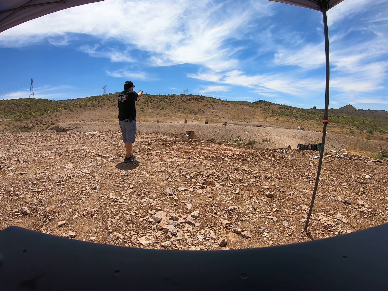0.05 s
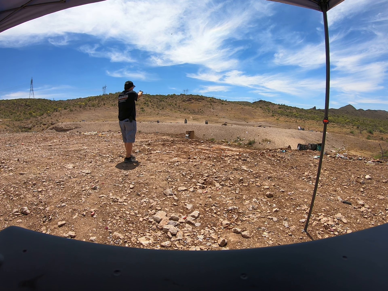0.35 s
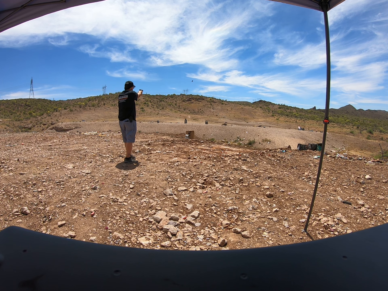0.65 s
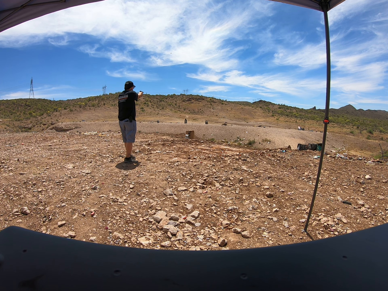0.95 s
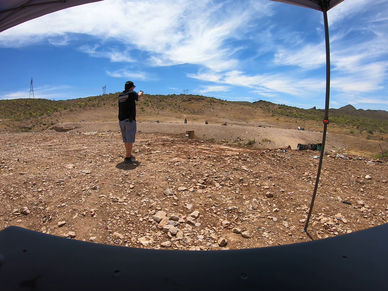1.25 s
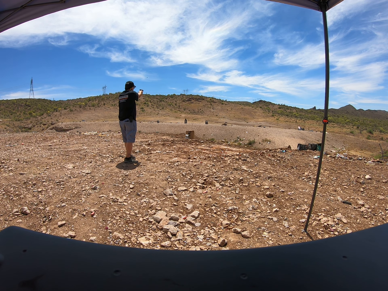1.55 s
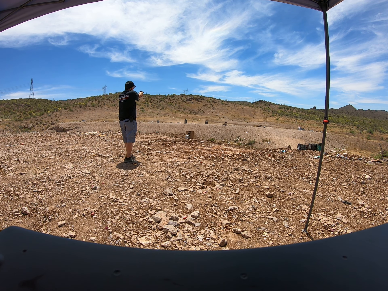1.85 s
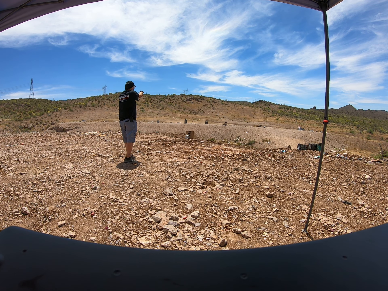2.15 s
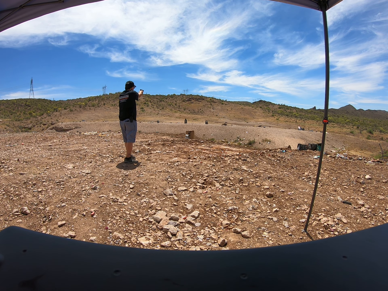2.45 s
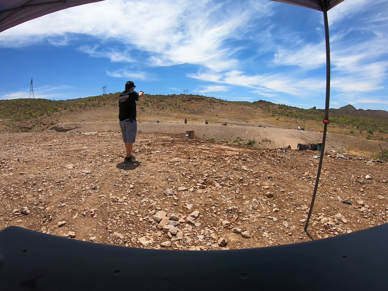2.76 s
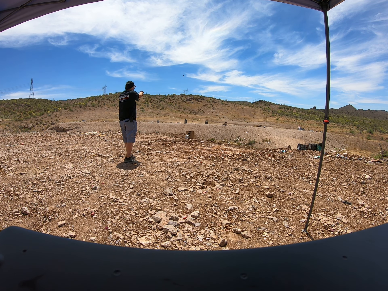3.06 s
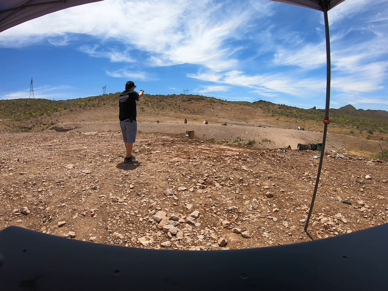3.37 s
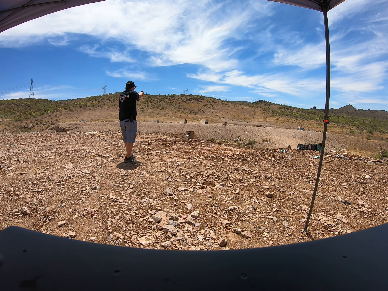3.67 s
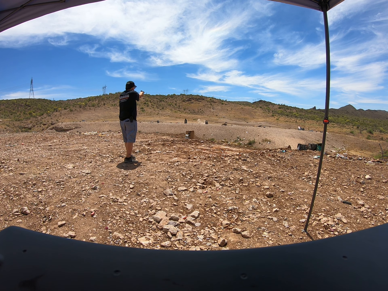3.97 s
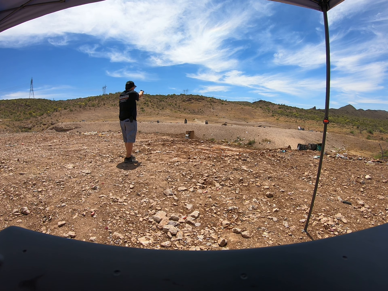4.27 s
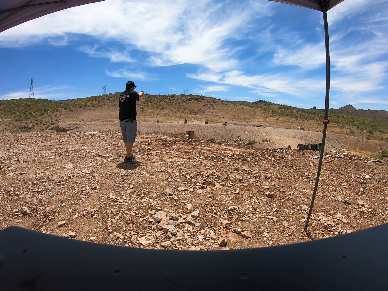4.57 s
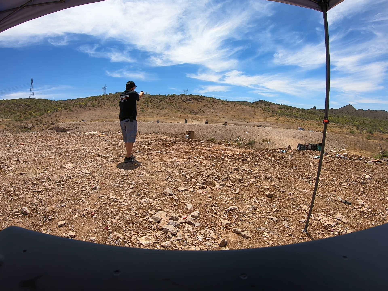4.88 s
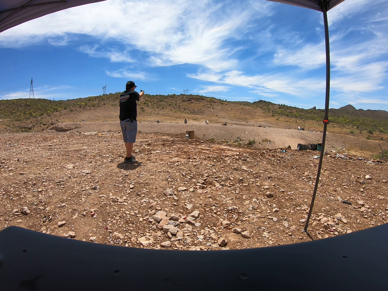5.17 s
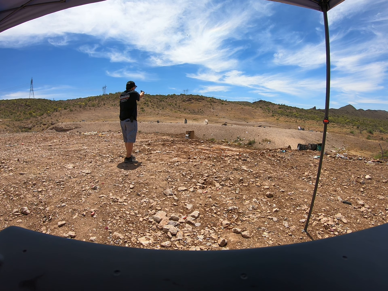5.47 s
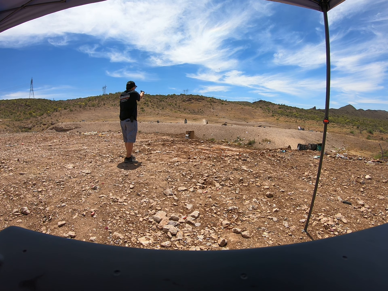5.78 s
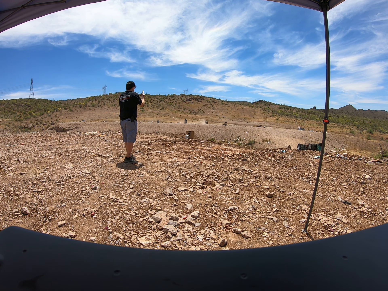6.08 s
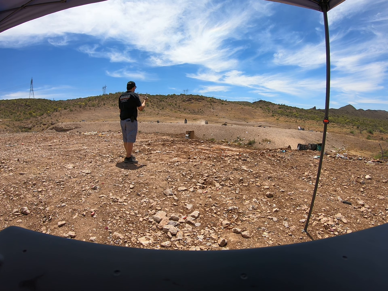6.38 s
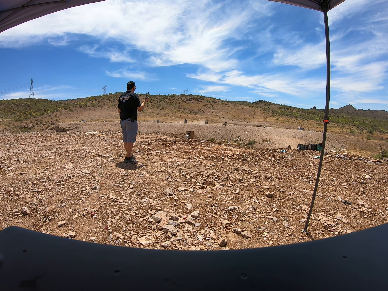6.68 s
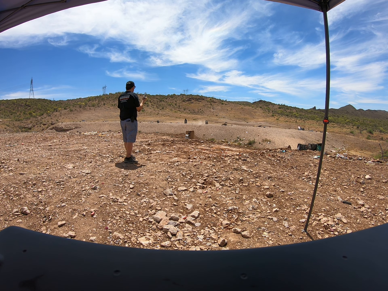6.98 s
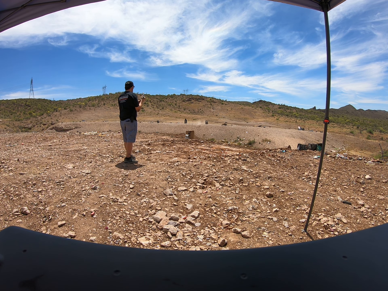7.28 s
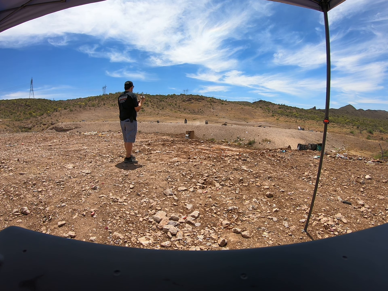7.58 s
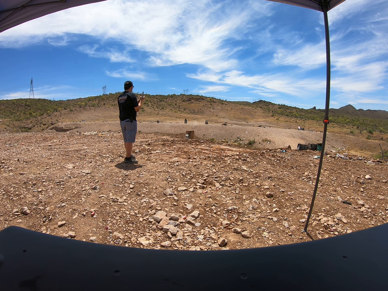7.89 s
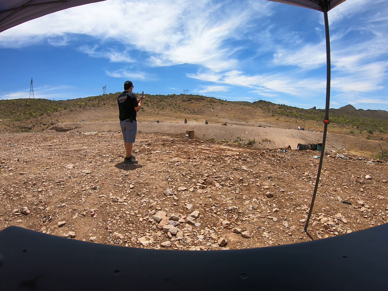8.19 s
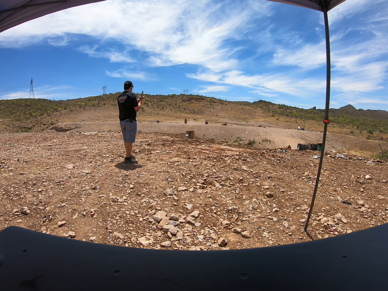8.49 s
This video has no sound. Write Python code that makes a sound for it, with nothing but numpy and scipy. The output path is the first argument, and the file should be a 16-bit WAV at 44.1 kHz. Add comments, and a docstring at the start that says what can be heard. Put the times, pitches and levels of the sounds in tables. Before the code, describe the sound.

At the very start a sharp bullet crack snaps back from downrange over lingering echoes and low wind rumble on the microphone. A pistol a few steps away then fires six loud shots, at about 0.6, 1.6, 2.4, 3.2, 4.1 and 5.0 seconds. Each blast overloads the microphone and scatters briefly off the gravel, and a quarter second later a sharp crack returns. Open hills answer every shot with rolling echoes, hollow swells and dull pops from far rock faces. Small gun clicks come near 1 and 4.5 seconds, and spent cases tinkle very faintly on stones. After the final crack at 5.2 seconds, the echoes die away over about three seconds. The gun gives a few soft metal clicks around 6.5 seconds and another at 7.1. Gusty wind continues until the end, near 8.6 seconds.

```python
"""A sharp crack snaps back from downrange over rumbling wind; then a pistol, a few steps away on a gravel
range, fires six steady shots. Each blast overloads the microphone and sprays off the stones; a quarter
second later the bullet's shock wave cracks back, and the same desert slopes and rock faces answer every
shot in turn. Spent cases tinkle and the gun clicks as it is handled. When the firing stops, the
camera's gain creeps up and lifts the last echoes."""
import sys
import numpy as np
from scipy import signal
from scipy.fft import rfft, irfft, next_fast_len
from scipy.io import wavfile

SR = 44100
rng = np.random.default_rng(int(sys.argv[2]) if len(sys.argv) > 2 else 0)


def log_audio(samples):
    """Write samples as a 16-bit WAV file to the path given in sys.argv[1]."""
    # one column per channel
    frames = np.atleast_2d(samples).T
    # limit to full scale, then quantise
    limited = np.clip(frames, -1, 1)
    pcm = np.round(limited * 32767).astype(np.int16)
    wavfile.write(sys.argv[1], SR, pcm)


N = 381004

# Cue levels are relative within each layer.
# muzzle blasts: (time [s], level [dB], rumble level [dB], low ring [Hz], low ring level [dB],
# high ring [Hz], high ring level [dB])
MUZZLE_BLASTS = [(0.6411, -0.5, -45, 417.7, -6.5, 2940, -5), (1.5642, -1.5, -42.5, 1027, -12.5, 2790, -2.5),
                 (2.4011, 0, -42, 615, -9, 3250, -5), (3.2485, -.5, -47, 570, -9.5, 2460, -9.5),
                 (4.0993, -1, -29, 663, -12, 2560, -9.5), (4.9866, -1, -45, 438, -0.5, 2463, -8)]
# shots fired before the scene opens, their echoes still under way: (time [s])
EARLIER_SHOT_TIMES = [-1.05, -.2]
# bullet shock waves thrown back: (time [s], level [dB], N wave length [ms], scatter level [dB])
BULLET_CRACKS = [(0.047, -1, .5, 1.5), (0.8889, -1, 0.53, 1.5), (1.8119, 0.5, 0.46, 1),
                 (2.6481, 1, 0.52, 2.5), (3.4966, -7, 0.36, 1), (4.3483, 0, 0.57, 2.5),
                 (5.2355, -2, 0.47, 1.5)]
# hillsides that answer every shot: (delay [s], rise [s], body level [dB], treble level [dB])
HILL_ECHOES = [(.05, .08, -54.5, -65.5), (.27, 0.08, -48, -61), (.47, .05, -48, -58), (.6, .12, -54, -67),
               (.87, .11, -53.5, -61.5), (1.14, .06, -51.5, -59), (1.33, 0.076, -50.5, -64),
               (1.55, 0.077, -55, -71), (1.84, 0.042, -52.5, -72.5), (2.05, .45, -75, -97)]
# dull pops off far rock faces: (delay [s], level [dB], centre [Hz])
ROCK_ECHOES = [(2.139, -51, 740), (2.193, -44, 800), (2.246, -49, 790), (2.357, -44, 800),
               (2.409, -55, 800), (2.465, -50, 710), (2.601, -40, 620), (2.652, -61.5, 780),
               (2.868, -61.5, 1200), (3.551, -50, 780)]
# hollow moans in the echo: (time [s], length [s], centre [Hz], width [Hz], level [dB])
ECHO_MOANS = [(0.934, 0.45, 810, 170, -47), (1.411, 0.11, 770, 170, -46), (1.901, .16, 588, 139, -39.5),
              (2.219, 0.18, 683, 130, -44.5), (3.689, 0.23, 526, 208, -30), (4.374, .27, 482, 150, -43),
              (4.636, 0.016, 500, 190, -31), (5.81, 0.19, 486, 140, -46)]
# metal clicks of the gun being handled: (time [s], level [dB], t60 [s])
GUN_CLICKS = [(1.018, -35.5, 0.022), (4.489, -39, 0.19), (6.2035, -81, 0.075), (6.429, -52, 0.062),
              (6.4479, -73, 0.064), (6.4935, -47.5, 0.071), (6.566, -46, 0.087), (7.1408, -47, 0.22)]
# cases landing on stones: (time [s], level [dB])
CASE_LANDINGS = [(1.018, -81), (1.135, -83), (2.85, -78), (4.48, -85), (4.54, -73), (5.28, -76),
                 (6.202, -81), (6.43, -79), (6.5, -80), (6.712, -85)]
# wind on the microphone: (time [s], level [dB])
WIND_LEVELS = [(0, -39.5), (.55, -46.5), (1.05, -45.5), (1.45, -54), (1.8, -35.5), (2.2, -65), (2.55, -45),
               (2.95, -52), (3.5, -45.5), (3.95, -38), (4.3, -41.5), (4.8, -57.5), (5.25, -38), (5.55, -45),
               (6.2, -55), (7.5, -53), (7.95, -46), (8.64, -48.5)]
# decay of the scatter off the gravel: (frequency [Hz], t60 [s])
GRAVEL_DECAY = [(60, 0.42), (200, 0.17), (600, 0.18), (1200, 0.22), (3000, 0.23), (6000, 0.17),
                (14000, 0.22)]

# noise colours: (frequency [Hz], relative level [dB])
RUSH_SPECTRUM = [(60, -11.5), (200, -9.5), (320, -0.5), (450, -5.5), (650, -5.5), (900, -5), (1250, -12),
                 (2000, -12.5), (2600, 2), (3500, -5.5), (5000, -13), (6500, -25.5), (11000, -27.5),
                 (16000, -51.5)]  # hiss leading into a blast
GRAVEL_SPECTRUM = [(40, -9.5), (130, -3.5), (200, -4), (300, -1.5), (550, -3.5), (1000, -14.5),
                   (1800, -16.5), (2800, -18), (4200, -20), (6000, -38.5), (8000, -39), (11000, -50),
                   (16000, -67.5)]  # scatter off the ground nearby
FAR_STONES_SPECTRUM = [(100, 0), (330, 6), (550, 5), (1000, -15.5), (1800, -15), (3000, -14), (5000, -21),
                       (6200, -32), (8500, -34), (14000, -57.5)]  # crackle from farther down the range
CRACK_RISE_SPECTRUM = [(60, -0.5), (300, -12), (500, 5), (1000, -0.5), (2100, 2), (3000, -5), (4200, -7.5),
                       (5200, -20.5), (6000, -30), (9000, -34), (15000, -51.5)]  # scatter before a crack
CRACK_TAIL_SPECTRUM = [(60, 1), (300, -9), (550, 0), (1000, -2), (2000, 1.5), (2800, -11), (4000, -11.5),
                       (6000, -33), (9000, -37.5), (15000, -59)]  # scatter after it
HILL_BODY_SPECTRUM = [(150, -7.5), (310, -8), (480, 3.5), (700, 4.5), (1000, 0), (1500, -8), (2200, -16.5),
                      (3500, -63.5)]  # midrange roll off the hills
HILL_TREBLE_SPECTRUM = [(700, -15.5), (1200, 2.5), (2000, 3), (2900, 7), (4000, -7.5), (5000, -12.5),
                        (5800, -35), (9000, -42), (15000, -59.5)]  # its bright edge
NEAR_SLOPE_SPECTRUM = [(500, 12.5), (1200, -1), (2200, -3), (3400, 13), (5000, -7.5), (6000, -50),
                       (9000, -46), (14000, -58)]  # smear off the nearest hillside
CLACK_SPECTRUM = [(600, 15), (1600, 5.5), (3000, 3), (4700, 3.5), (6000, -19), (8500, -8), (11000, -40),
                  (15000, -38)]  # gun parts
WIND_SPECTRUM = [(12, -24.5), (20, -8), (44, -1), (156, -11.5), (243, -22.5), (278, -28.5), (428, -32),
                 (448, -42.5), (700, -48.5), (910, -90), (1540, -120)]  # buffeting on the microphone
AIR_SPECTRUM = [(100, 2.5), (1000, -9.5), (2500, -19), (4800, -19), (5800, -39), (8000, -38), (10000, -39),
                (15000, -41.5)]  # open-air hiss


def pistol(rush_db=-18.5, gravel_db=-9.0, repeat_share=0.29, slap_s=0.0534, slap_db=-14.5):
    """A metallic rush swells into each blast; the ground scatters it and something near slaps it back."""
    out, t = np.zeros(N), clock(0.5)
    # gun and camera stay put, so part of the ground's answer repeats from shot to shot
    repeating = np.sqrt(repeat_share) * gravel_scatter(t)
    # stones farther down the range crackle back, cresting 0.16 s after the blast
    far_swell = from_db(-44) * 0.5 ** (((t - 0.16) / 0.085) ** 2)
    for s, db, _, *rings in MUZZLE_BLASTS:
        lead_s, rush = metallic_rush(*rings)
        add(out, s - lead_s, from_db(db + rush_db) * rush)
        bang = from_db(db) * muzzle_blast()
        add(out, s, bang)
        scatter = repeating + np.sqrt(1 - repeat_share) * gravel_scatter(t)
        add(out, s + 0.0018, from_db(db + gravel_db) * scatter)
        add(out, s + slap_s, from_db(slap_db) * cut(bang, 3100, "high", order=3))
        add(out, s, far_swell * noise(FAR_STONES_SPECTRUM, len(t), grain_db=6.0))
    return out


def muzzle_blast(push_ms=0.4, bounce_ms=1.5, ring_hz=1120, ring_t60=0.0035, thump_ms=1.2, gain_db=12.0):
    """A pressure jump, its suction and its ground bounce; the camera rings and the gas cloud thumps."""
    t = clock(0.06)
    phase = t * 1000 / (push_ms * np.exp(0.1 * rng.standard_normal()))
    pressure = (1 - phase) * np.exp(-phase)
    wave = cut(cut(pressure, 430, "high"), 3000, "low", order=3)
    pitch_hz = ring_hz * (1 + 0.013 * rng.standard_normal())
    ring = from_db(-14 - 60 * t / ring_t60) * np.sin(2 * np.pi * pitch_hz * t)
    thump_phase = t * 1000 / thump_ms
    thump = from_db(-15) * thump_phase * (thump_phase - 2) * np.exp(-thump_phase)
    bounce = from_db(-1.5) * np.interp(t - bounce_ms / 1000, t, cut(wave, 1100, "low"), left=0)
    return from_db(gain_db) * (wave + ring + thump + bounce)


def metallic_rush(low_hz, low_db, high_hz, high_db, lead_s=0.042, rise_s=0.014, fall_s=0.0017):
    """Hiss with a low and a high ring swells into the bang; returns its lead time and the sound."""
    t, size = clock(0.06) - lead_s, len(clock(0.25))
    swell = 0.5 ** ((t / np.where(t < 0, rise_s, fall_s)) ** 2)
    hiss = rippled(noise(RUSH_SPECTRUM, size), depth_db=9.0, spacing_hz=110)
    parts = [(-3.5, hiss), (low_db, hollow(low_hz, 90, size)), (high_db, hollow(high_hz, 190, size))]
    return lead_s, sum(from_db(db) * rms_one(part[:len(t)] * swell) for db, part in parts)


def gravel_scatter(t):
    """Stony ground sprays the blast back, each octave dying at its own rate."""
    crackle, out = noise(GRAVEL_SPECTRUM, len(t), grain_db=6.0), np.zeros(len(t))
    edges_hz = 30 * 2.0 ** np.arange(10)
    for low, high in zip(edges_hz, edges_hz[1:]):
        t60 = at_hz(GRAVEL_DECAY, np.sqrt(low * high))
        out += cut(crackle, [low, high], "band") * from_db(-60 * t / t60)
    return out


def downrange_cracks(front_share=0.36, gain_db=9.5, bounce_s=0.006, rise_t60=0.12, fall_t60=0.19):
    """The bullet's N wave returns with a ground bounce, in a cloud of scatter that swells and fades."""
    out, t = np.zeros(N), clock(0.25)
    from_crest_s = np.hypot(t, 0.017) - 0.017  # rounds off the cloud's crest
    for s, db, length_ms, scatter_db in BULLET_CRACKS:
        phase = t * 1000 / length_ms
        # pressure jumps up, slides below zero and snaps back; the rear shock is the stronger
        n_wave = (front_share - phase) * (phase < 1)
        snap = cut(cut(n_wave, 1000, "high", order=1), 4200, "low", order=4)
        bounce = from_db(-17.5) * np.interp(t - bounce_s, t, cut(snap, 1800, "low"), left=0)
        add(out, s, from_db(db + gain_db) * (snap + bounce))
        rise = from_db(scatter_db - 25 - 60 * from_crest_s[::-1] / rise_t60)
        cloud = rippled(noise(CRACK_RISE_SPECTRUM, len(t), grain_db=3.5), depth_db=5.0, spacing_hz=109.7)
        add(out, s - t[-1], rise * cloud)
        fall = from_db(scatter_db - 31 - 60 * from_crest_s / fall_t60)
        add(out, s, fall * noise(CRACK_TAIL_SPECTRUM, len(t), grain_db=3.5))
    return out


def floor_rumble(delay_s=0.13, length_s=0.2, centre_hz=112, width_hz=96):
    """The bass of each blast comes back off the range floor as one low swell."""
    out, size = np.zeros(N), len(clock(length_s))
    for s, _, db, *_ in MUZZLE_BLASTS:
        add(out, s + delay_s, from_db(db) * hollow(centre_hz, width_hz, size) * np.hanning(size))
    return out


def hills(lumps_db=1.9, pops_per_s=60, top_at_one_second_hz=3020, air_dulling=0.89):
    """Each slope rolls each shot back in countless reflections: quick rise, slow fall, small pops."""
    out, body_power, t = np.zeros(N), np.zeros(N), clock(4)
    for delay_s, rise_s, body_db, treble_db in HILL_ECHOES:
        smear, power = t / rise_s * np.exp(1 - t / rise_s), np.zeros(N)
        for s in shot_times():
            add(power, s + delay_s, smear ** 2)
        body_power += from_db(body_db) ** 2 * power
        impulses = (rng.random(N) < pops_per_s / SR) * rng.uniform(-0.057, 1, N)
        pops = rms_one(cut(impulses + 1e-18, [900, 2300], "band", order=3))
        treble = noise(HILL_TREBLE_SPECTRUM, N, grain_db=1.0) + from_db(-1) * pops
        top_hz = top_at_one_second_hz / delay_s ** air_dulling  # air dulls the later echoes
        out += from_db(treble_db) * np.sqrt(power) * rms_one(cut(treble, top_hz, "low", order=6))
    lumps = flutter(lumps_db, top_hz=63)
    body = np.sqrt(body_power) * noise(HILL_BODY_SPECTRUM, N, grain_db=1.5)
    return lumps * (out + body)


def echo_moans(edge_share=0.59, skirt_hz=750, skirt_width_hz=650):
    """Hollow moans rise and sink in the echo, fluttering, each inside a broader rush."""
    out = np.zeros(N)
    for s, length_s, hz, width_hz, db in ECHO_MOANS:
        size = len(clock(length_s))
        core = from_db(-0.5) * hollow(hz, width_hz, size)
        skirt = from_db(-9.5) * hollow(skirt_hz, skirt_width_hz, size)
        add(out, s, from_db(db) * (core + skirt) * signal.windows.tukey(size, edge_share))
    return out * flutter(depth_db=2.5, top_hz=25)


def rock_faces(width_hz=480, snap_t60=0.015, tail_t60=0.1, top_hz=1700):
    """Far rock faces return every shot; distance leaves only a dull snap and a short tail."""
    out, t = np.zeros(N), clock(0.2)
    fade = from_db(-9 - 60 * t / snap_t60) + from_db(-12.5 - 60 * t / tail_t60)
    for delay_s, db, hz in ROCK_ECHOES:
        for s in shot_times():
            add(out, s + delay_s, from_db(db) * fade * hollow(hz, width_hz, len(t)))
    return cut(out + 1e-18, top_hz, "low", order=4)


def near_slope(delay_s=0.24, rise_s=0.019, level_db=-57.5):
    """The nearest hillside answers each crack with a soft, bright smear."""
    out, t = np.zeros(N), clock(0.25)
    smear = t / rise_s * np.exp(1 - t / rise_s)
    for s, *_ in BULLET_CRACKS:
        add(out, s + delay_s, from_db(level_db) * smear * noise(NEAR_SLOPE_SPECTRUM, len(t), grain_db=1))
    return out


def gun_handling(trim_db=-11.0):
    """The gun's metal parts clack in short bursts of noise."""
    out, t = np.zeros(N), clock(0.37)
    for s, db, t60 in GUN_CLICKS:
        add(out, s, from_db(db + trim_db - 60 * t / t60) * noise(CLACK_SPECTRUM, len(t), grain_db=-0.5))
    return out


def spent_cases(ring_hz=7700, t60=0.3, bounce_db=-4.0):
    """Each brass case sings one high note, beating as it spins, and lands twice."""
    out, t = np.zeros(N), clock(0.37)
    for s, db in CASE_LANDINGS:
        spin = 1 + 0.27 * np.cos(2 * np.pi * rng.uniform(26, 50) * t)
        pitch_hz = ring_hz * (1 + 0.0024 * rng.standard_normal())
        note = from_db(db - 60 * t / t60) * spin * np.sin(2 * np.pi * pitch_hz * t)
        add(out, s, note)
        add(out, s + rng.uniform(0.012, 0.055), from_db(bounce_db) * note)
    return out


def wind(buffet_db=3.0, air_db=-78.5):
    """Wind buffets the microphone with a lumpy rumble, over the faint hiss of open air."""
    wind_db = np.interp(np.arange(N) / SR, *np.transpose(WIND_LEVELS))
    gusts = from_db(wind_db) * flutter(buffet_db, top_hz=5.3)
    return gusts * noise(WIND_SPECTRUM, N) + from_db(air_db) * noise(AIR_SPECTRUM, N)


def shot_times():
    """Firing times of all the shots that echo."""
    return EARLIER_SHOT_TIMES + [s for s, *_ in MUZZLE_BLASTS]


def noise(spectrum, size, grain_db=0):
    """Coloured noise, rms 1; grain_db makes it crackle like separate small reflections."""
    n = next_fast_len(size)
    hz = np.arange(n // 2 + 1) * SR / n
    grains = from_db(grain_db * np.minimum(rng.standard_normal(n // 32 + 1), 2.5))
    grainy = np.repeat(grains, 32)[:n] * rng.standard_normal(n)
    colour = from_db(at_hz(spectrum, hz)) * (hz > 18)
    return rms_one(irfft(rfft(grainy) * colour, n)[:size])


def hollow(hz, width_hz, size):
    """Noise in one resonance with gentle skirts, rms 1."""
    f = np.arange(size // 2 + 1) * SR / size + 1
    detune = (f - hz * hz / f) / width_hz
    return rms_one(irfft(np.exp(2j * np.pi * rng.random(len(f))) / (1 + detune ** 2) ** 2.4, size))


def rippled(x, depth_db, spacing_hz):
    """Metallic peaks and notches: a random gain every spacing_hz, shallower in the bass."""
    hz = np.arange(len(x) // 2 + 1) * SR / len(x)
    ripple = np.interp(hz / spacing_hz, np.arange(1000), rng.uniform(-1, 1, 1000))
    return irfft(rfft(x) * from_db(depth_db * ripple * np.minimum(hz / 1500, 1)), len(x))


def flutter(depth_db, top_hz):
    """A gain that wavers at random by depth_db rms."""
    return from_db(depth_db * rms_one(cut(rng.standard_normal(N), top_hz, "low")))


def from_db(db):
    """Decibels to gain."""
    return 10 ** (np.asarray(db) / 20)


def rms_one(x):
    """Scale to unit rms."""
    return x / np.sqrt(np.mean(x ** 2) + 1e-20)


def clock(seconds):
    """Sample times from zero."""
    return np.arange(int(seconds * SR)) / SR


def at_hz(points, hz):
    """Read a table on a log-frequency axis."""
    f, value = np.transpose(points)
    return np.interp(np.log(hz + 1e-9), np.log(f), value)


def add(out, s, sound):
    """Mix a sound in from time s."""
    i = int(round(s * SR))
    lo, hi = max(i, 0), min(i + len(sound), len(out))
    if hi > lo:
        out[lo:hi] += sound[lo - i:hi - i]


def cut(x, hz, kind, order=2):
    """Causal Butterworth filter."""
    return signal.sosfilt(signal.butter(order, np.clip(hz, 10, 0.45 * SR), kind, fs=SR, output="sos"), x)


def gain_control(x, target_db=-10.5, release_db_per_s=13.5, boost_db=8.0):
    """The camera's gain starts low and peaks hold it down; in the quiet it creeps up to full boost."""
    recovery_db = release_db_per_s * np.arange(N) / SR
    peak_db = 20 * np.log10(np.abs(x) + 1e-9)
    held_db = np.maximum.accumulate(np.maximum(peak_db + recovery_db, 0), axis=-1) - recovery_db
    return x * from_db(np.clip(target_db - held_db, 0, boost_db))


def scene():
    """Gunfire, echoes, small metal and wind at one microphone."""
    gunfire = pistol() + downrange_cracks()
    echoes = floor_rumble() + near_slope() + hills() + rock_faces() + echo_moans()
    return (gunfire + echoes + gun_handling() + spent_cases() + wind())[None]


def record(dry, soften_hz=9000, stopband_hz=16536):
    """Blasts flatten against full scale and duck the gain; the treble is softened and the top is cut."""
    overloaded = 0.97 * dry / (1 + dry ** 6) ** (1 / 6)
    softened = cut(gain_control(overloaded), soften_hz, "low", order=1)
    return signal.sosfilt(signal.cheby2(14, 70, stopband_hz, fs=SR, output="sos"), softened)


dry = scene()
out = record(dry)
log_audio(out)
```